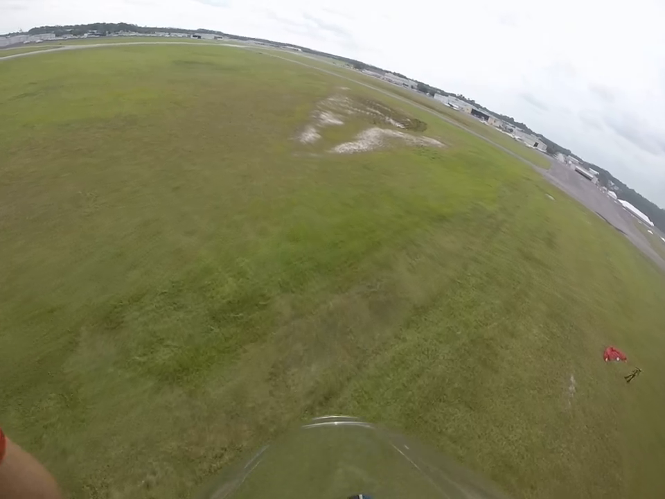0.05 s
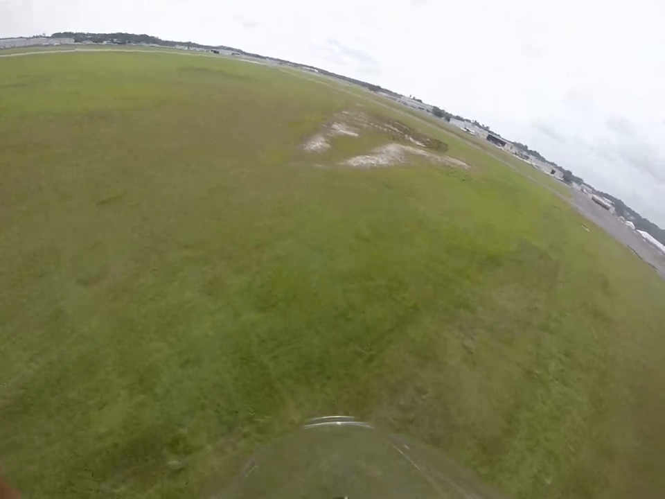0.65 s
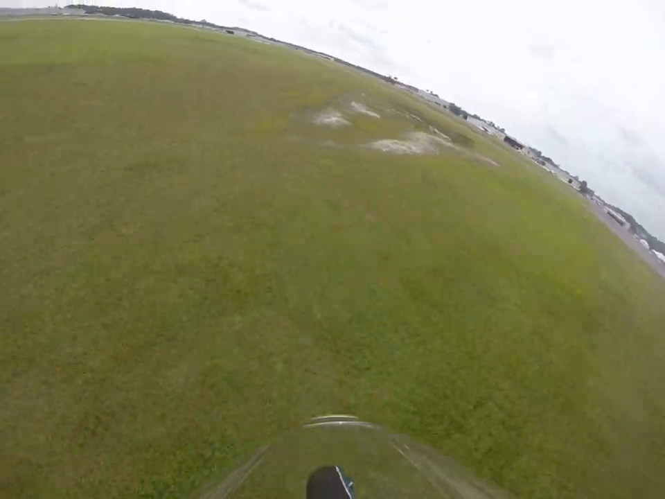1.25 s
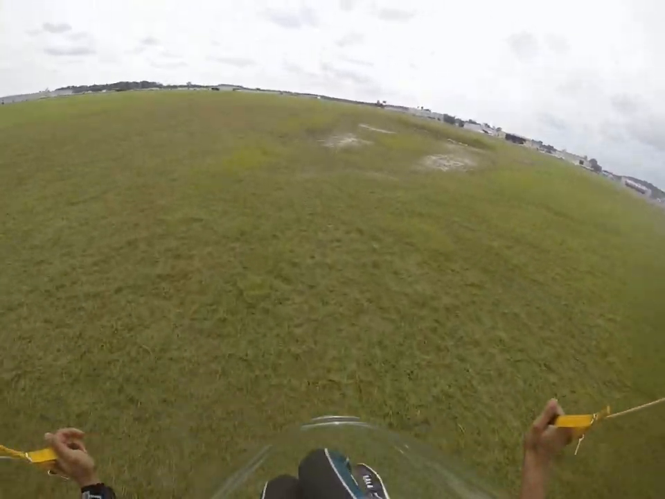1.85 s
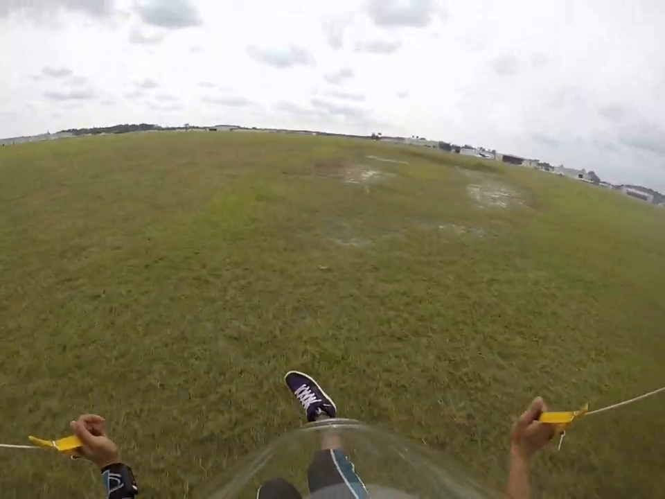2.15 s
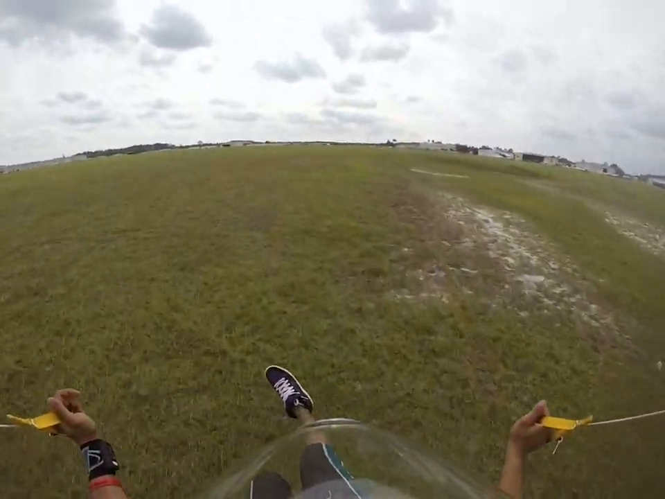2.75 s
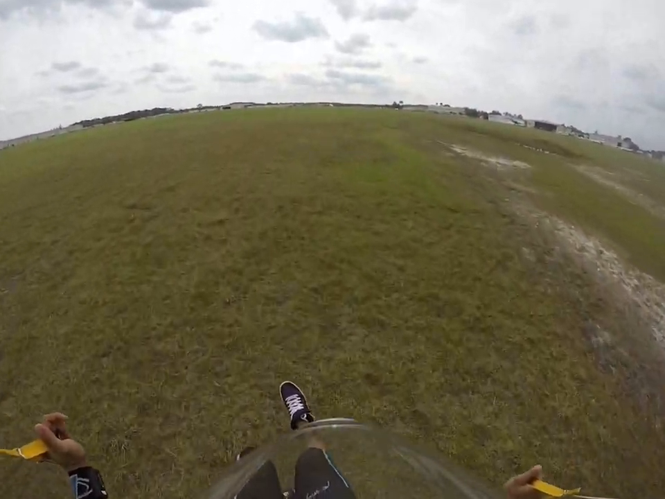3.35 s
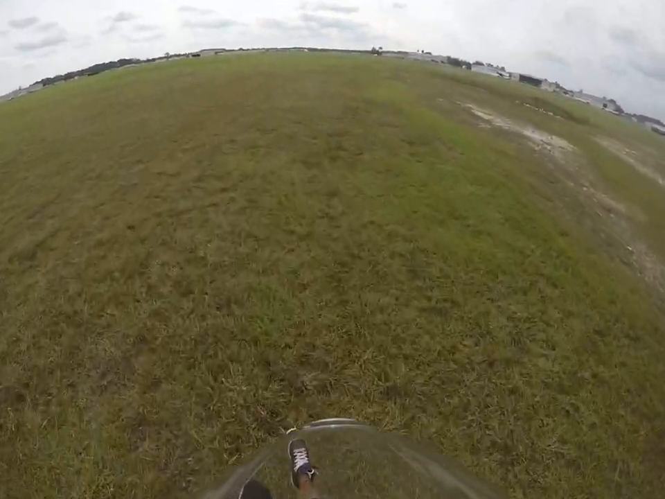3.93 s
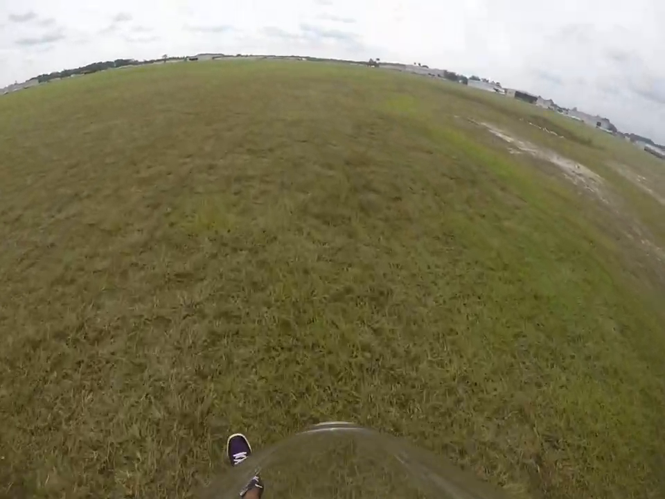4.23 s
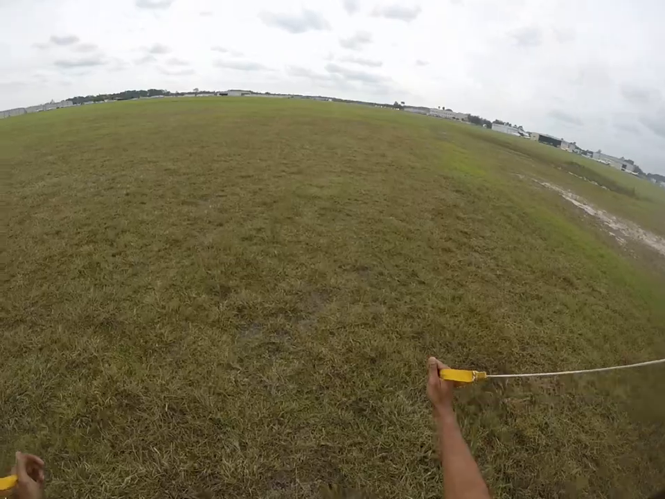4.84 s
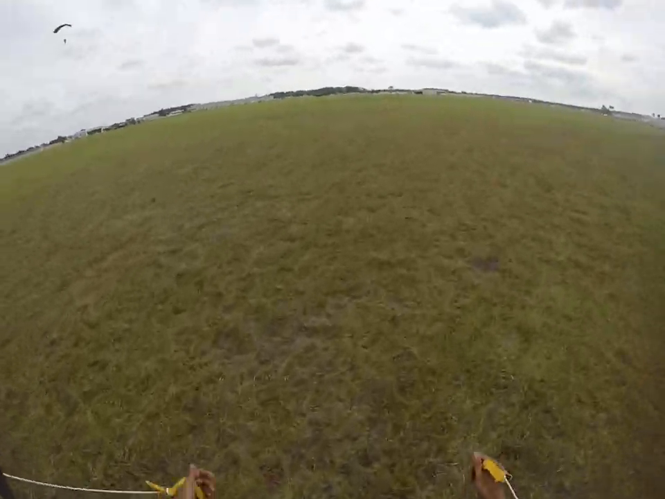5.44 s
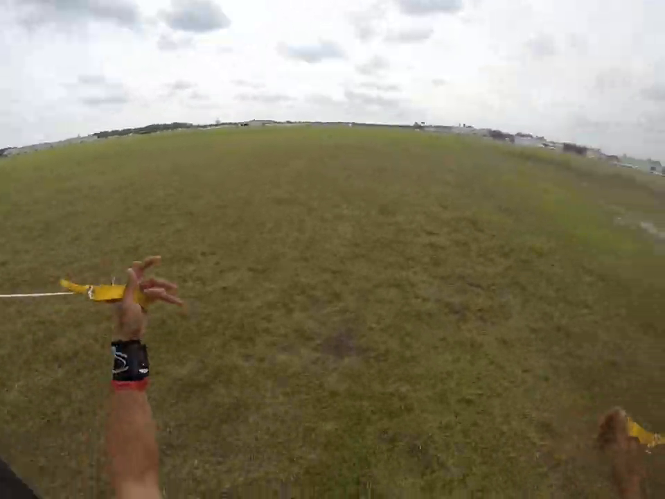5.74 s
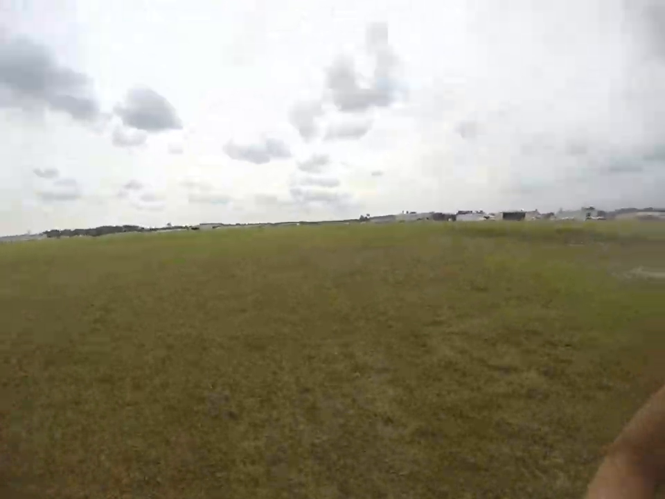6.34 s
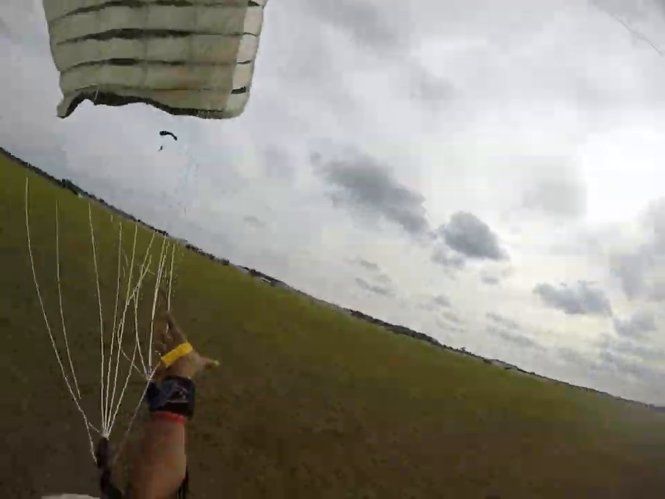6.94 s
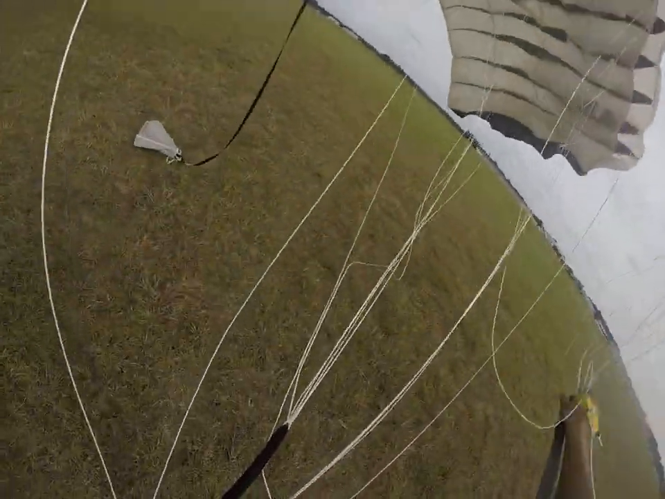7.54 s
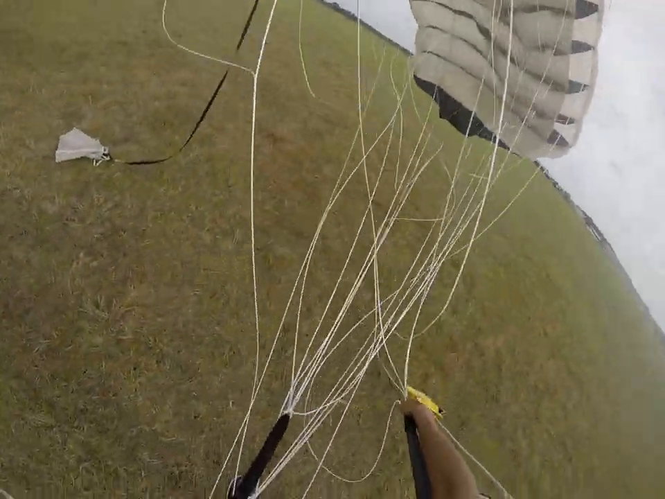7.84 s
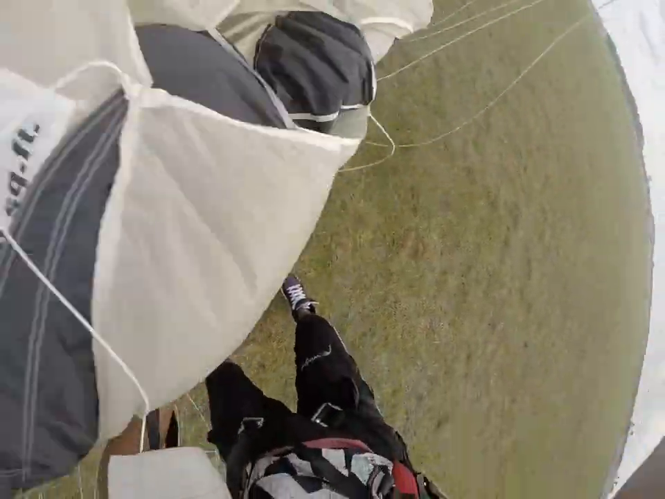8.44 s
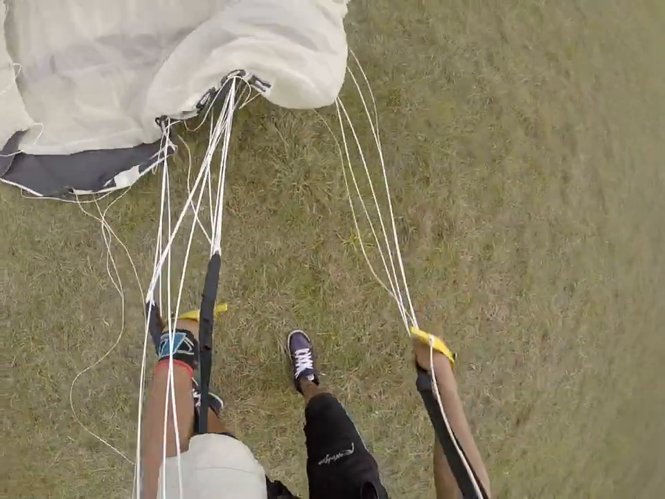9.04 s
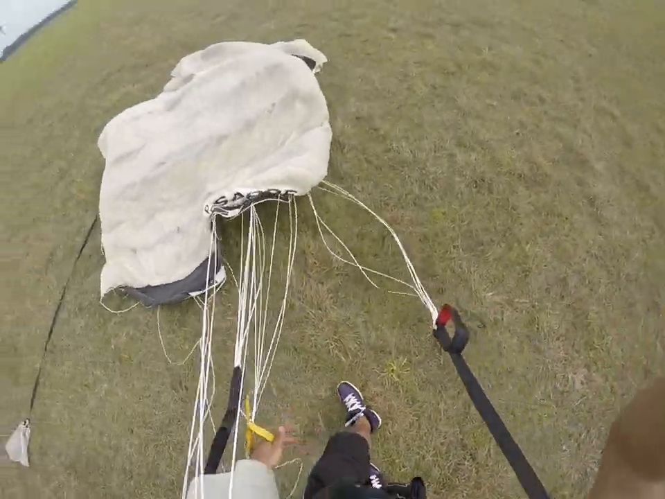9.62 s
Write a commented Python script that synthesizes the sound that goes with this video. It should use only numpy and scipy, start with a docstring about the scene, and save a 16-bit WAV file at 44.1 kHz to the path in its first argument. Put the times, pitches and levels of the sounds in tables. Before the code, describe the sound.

Wind rushes over a helmet microphone and fades, then a landing parachutist's booming footfalls, ticking gear and close scraping cloth follow.

```python
"""Wind rushes over the microphone of a cased helmet camera (mono) as a parachutist swoops over a grass field.
The air rings in the case's resonances and dies with the speed in the flare. The landing is run out
right under the microphone: footfalls boom through body and helmet, soles scuff the turf, gear ticks
and knocks. At the end lines and canopy cloth scrape over the helmet, very close, in a light breeze."""
import sys
import numpy as np
from scipy import signal
from scipy.fft import rfft, irfft, next_fast_len
from scipy.io import wavfile
from scipy.ndimage import uniform_filter1d

SR = 44100
rng = np.random.default_rng(int(sys.argv[2]) if len(sys.argv) > 2 else 0)


def generate_wav(signal):
    """Clip the signal to [-1, 1] and save it as 16-bit WAV at the path in sys.argv[1]."""
    frames = np.transpose(np.atleast_2d(signal))
    scaled = np.clip(frames, -1, 1) * 32767
    pcm = np.round(scaled).astype(np.int16)
    wavfile.write(sys.argv[1], SR, pcm)


N = 426888
TIME = np.arange(N) / SR
SHORT = TIME[:SR]  # one second

# airflow at the case: gusts in the last turn, level swoop, then the flare (time [s], strength [dB])
AIRFLOW_CURVE = [(0.0, -20), (0.46, -20), (0.62, -26), (0.71, -22.5), (0.79, -24), (0.85, -17.5),
                 (0.91, -19), (0.98, -17), (1.24, -18), (1.83, -18.5), (1.91, -21), (2.19, -23),
                 (2.29, -25), (2.4, -24), (3.18, -40.5), (4.24, -58), (4.28, -58.5)]
# roar, hollow, rush and hiss of the air: (level in the swoop [dB], slope [dB per dB of airflow],
# lift in slanting air [dB])
AIR_BANDS = [(-34, 0.545, 2), (-23.5, 0.75, -2), (-18.5, 1.0, -1.4), (-28.5, 1.18, 4)]
# edges of those four bands: (frequency [Hz])
AIR_BAND_EDGES = [110, 1100, 2200, 4700, 20000]
# air resonances of the case around the microphone: (frequency [Hz], half width [Hz], lift [dB])
CASE_RESONANCES = [(630, 43, 3.5), (1378, 65, 3.5), (1594, 232, 13), (2420, 92.0, 5), (2923, 74.0, 8),
                   (3444, 280, 15.5), (4046, 65, 7), (4850, 60, 5.5), (5600, 130, 5), (6150, 230.0, 8.5),
                   (7460.0, 170.0, 3.0)]
# edge whistles in the slipstream: (time [s], length [s], start pitch [Hz], end pitch [Hz], level [dB])
EDGE_WHISTLES = [(.51, .13, 6400, 6500, -39), (.605, .13, 5050, 5090, -33), (.72, .10, 6350, 6640, -39.5)]
# footfalls of the run-out: (time [s], boom level [dB], push length [s], skid length [s])
FOOTFALLS = [(4.323, -11.5, 0.012, 0.02), (4.358, -4.5, 0.0032, 0.027), (4.473, -4, 0.0042, .035),
             (4.528, -14, 0.018, 0.022), (4.778, -5, 0.012, 0.053), (5.334, -10.5, 0.0058, 0.037),
             (5.719, -.5, 0.0081, 0.042), (6.05, -6, 0.006, 0.009), (6.391, -3, 0.0092, 0.0078),
             (6.763, -0.5, 0.014, 0.036), (7.096, -10, 0.015, 0.012), (7.503, -14, 0.022, 0.011)]
# gear and canopy jolting the helmet: (time [s], boom level [dB], push length [s],
# ring length [factor], thud level [dB])
HELMET_JOLTS = [(4.689, -18.5, .015, 1, -38.5), (4.838, -14, .0025, .3, -22),
                (5.62, -36, 0.0033, 0.79, -36), (8.331, -5.5, 0.005, 0.55, -20.5),
                (8.405, -5.5, 0.0076, 0.75, -24), (8.538, -15, 0.0026, 0.9, -21),
                (8.758, -29, 0.0031, 1.2, -34), (9.054, -39, 0.0097, 0.95, -42.5),
                (9.327, -33, .01, 1.23, -46)]
# modes of the helmet on the head: (frequency [Hz], relative level [dB], base t60 [s])
HELMET_MODES = [(33, -6, 0.26), (50.9, 4.5, 0.45), (57.07, -10.5, 0.93), (77, -19, 0.07), (109, -9.5, 0.42),
                (168, -10.5, 0.2), (234, -5.5, 0.14)]
# hard knocks on the helmet: (time [s], level [dB], tilt [dB/octave], contact [s], relative tail [dB],
# shell ring pitch [Hz], ring level [dB], ring t60 [s], after-ring level [dB])
SHELL_KNOCKS = [(4.8358, -7, 0.3, 0.0032, -28, 1430, -11, 0.024, -65.5),
                (8.537, -10.5, -0.5, 0.0047, -8, 1870, -6.5, 0.029, -53)]
# strikes on the metal harness rings: (time [s], level [dB], ring length [factor])
HARNESS_STRIKES = [(4.335, -20.5, 0.24), (5.333, -43.5, 0.83)]
# modes of a harness ring: (frequency [Hz], relative level [dB], base t60 [s])
HARNESS_MODES = [(3208, 0, .33), (4560, -6, .17), (5820, -14, .12)]
# cloth and lines dragged over the helmet: (time [s], length [s], level [dB], sheen above 7 kHz [dB],
# catches [1/s])
CLOTH_STROKES = [(5.608, 0.007, -22.5, -20, 1200), (5.622, 0.013, -19.5, -17.5, 4800),
                 (5.638, 0.0053, -25.5, -24, 890), (5.645, 0.021, -24, -14, 1300),
                 (8.326, 0.0257, -14.5, -3, 4500), (8.352, 0.06, -18.5, 0.5, 8400),
                 (8.402, .014, -18, -17, 5000)]
# clear ticks of lines, toggles and buckles: (time [s], level [dB])
GEAR_TICKS = [(4.334, -20.5), (4.359, -19.5), (4.446, -41), (4.468, -37.5), (4.503, -39), (4.558, -38.5),
              (4.775, -34), (4.817, -33.5), (5.197, -52), (5.331, -36.5), (5.391, -41.5), (5.471, -48.5),
              (5.721, -31), (5.837, -45), (6.229, -51), (6.373, -40), (6.746, -41), (6.79, -50.5),
              (6.965, -48), (7.08, -42.5), (7.262, -39.5), (7.531, -37), (8.669, -44.5), (8.751, -48),
              (8.797, -49), (8.939, -34.5), (9.149, -38), (9.309, -42)]
# air and cloth swelling past the helmet: (centre time [s], half width [s], level [dB])
SWELLS = [(4.51, 0.025, -58), (6.499, 0.22, -59.5), (8.48, 0.042, -49.5), (8.79, .025, -57),
          (8.91, 0.03, -53), (9.03, 0.045, -49)]
# breeze on the field: (time [s], base level [dB])
BREEZE_CURVE = [(4.72, -55.5), (4.92, -67.5), (5.2, -67.5), (5.45, -62), (6.1, -60), (6.55, -59.5),
                (7.4, -56.5), (8.1, -59), (9.1, -54), (9.6, -59)]

# rushing air: (frequency [Hz], relative density [dB])
RUSH_SPECTRUM = [(100.0, -6), (280.0, -2.5), (420.0, -11.5), (1050.0, -7.5), (1400.0, -7), (2100.0, -3),
                 (4400.0, -5.5), (6300.0, -22), (7000.0, -28), (10500.0, -34.5), (15000.0, -47)]
# helmet shaken by eddies: (frequency [Hz], relative density [dB])
BUFFET_SPECTRUM = [(11, -32.5), (18, -11.5), (54, 3.5), (67, 3), (92, -7.5), (124, -2), (160, -29.5),
                   (210, -43), (350, -120)]
# helmet swaying with the jumper: (frequency [Hz], relative density [dB])
SWAY_SPECTRUM = [(11, -25.5), (18, -5.5), (27, -0.5), (43, -5), (63, -10), (86, -39.5), (114, -40),
                 (200, -43), (260, -77), (440, -120)]
# dull thud of a step or jolt: (frequency [Hz], relative density [dB])
THUD_SPECTRUM = [(20, 1), (35, -6), (70, 3), (130, -5.5), (190, -13.5), (300, -21), (500, -36.5),
                 (1000, -51.5), (3000, -77)]
# blow on the shell: (frequency [Hz], relative density [dB])
KNOCK_SPECTRUM = [(120, 8.5), (300, 2), (600, 1), (900, -5), (1500, -2.5), (2700, -5), (3600, -14.5),
                  (6200, -16), (7500, -42.5), (15000, -58)]
# cloth on the shell: (frequency [Hz], relative density [dB])
SCRAPE_SPECTRUM = [(200, -6), (700, -6), (1600, -7.5), (2500, 1), (3500, -6), (4700, 1), (6400, -8.5),
                   (8200, -4), (11000, -14), (15000, -17)]
# ticking gear and swishing cloth: (frequency [Hz], relative density [dB])
GEAR_SPECTRUM = [(200, 1), (700, -6.5), (1400, -4), (2700, 0), (3500, -6.5), (6300, -10.5), (7200, -17),
                 (14000, -32)]
# soles in the turf: (frequency [Hz], relative density [dB])
SCUFF_SPECTRUM = [(100, -2), (190, 5.5), (240, 1.5), (330, 1), (450, -8.5), (750, -8.5), (950, -11),
                  (1150, -17.5), (2000, -20.5), (3500, -28.5), (6000, -34), (7500, -50), (15000, -62.5)]
# light air in the case: (frequency [Hz], relative density [dB])
BREEZE_SPECTRUM = [(60, -13.5), (120, 14.5), (190, 4), (300, 6), (420, -3.5), (520, -1), (590, 4.5),
                   (700, -3.5), (1000, -4), (1700, -8.5), (2200, -6), (3600, -7.5), (6500, -19.5),
                   (15000, -34)]

SWOOP_DB = -17.5  # airflow strength in the level swoop
TURN_END_S, ROLL_OUT_S = .81, .06  # in the turn the air meets the case at a slant
BUFFET_DB, BUFFET_SLOPE = -31.5, 0.39  # shaking of the helmet in the swoop; dB per dB of airflow
TOUCHDOWN_S, RUN_START_S, RUN_END_S = 4.32, 5.1, 7.6
# thud and scuff relative to the boom at touchdown; both soften as the run slows
THUD_DB, THUD_FALL_DB_PER_S = -10.5, 8
SCUFF_DB, SCUFF_FALL_DB_PER_S, SCUFF_LEAD_S = -17.5, 9, .003
RING_AT_FULL, RING_PER_DB = 0.75, 0.0057  # ring length factor: the padding damps hard pushes sooner
HEAVY_TICK_DB, TICK_DULLING = -33, 0.39  # heavier parts tick louder and duller: dB/octave per dB over
AFTER_RING_HZ, AFTER_RING_T60_S = 1850, .8  # a faint ring of the shell sings on after each knock
JIGGLE_PER_S, JIGGLE_DB, JIGGLE_SPREAD_DB, JIGGLE_T60_S = 6.8, -52, 3, 0.015


def slipstream():
    """Turbulence blows through the case; slower air makes larger eddies, so the treble fades first."""
    flow_db = airflow_db()
    slant = np.clip((TURN_END_S - TIME) / ROLL_OUT_S + .5, 0, 1)
    air = colour(rng.standard_normal(N), RUSH_SPECTRUM, case=1.0)
    rush = np.zeros(N)
    for lo, hi, (db, slope, slant_db) in zip(AIR_BAND_EDGES, AIR_BAND_EDGES[1:], AIR_BANDS):
        rush += unit(band(air, lo, hi)) * undb(db + slope * flow_db + slant_db * slant)
    eddies_db = 0.23 * walk(25) + .6 * walk(160)
    return rush * undb(eddies_db) * np.interp(TIME, [4.3, 4.77, 4.87], [1, .6, 0])


def buffeting():
    """Slow eddies shake the helmet; on the ground it sways more gently with the jumper."""
    airborne_db = BUFFET_DB + BUFFET_SLOPE * airflow_db()
    sway_db = np.interp(TIME, [5.1, 6.6, 7.9, 9.68], [-38.5, -30, -38, -46.5])
    eddies = unit(colour(rng.standard_normal(N), BUFFET_SPECTRUM)) * undb(airborne_db + 1.3 * walk(22))
    sway = unit(colour(rng.standard_normal(N), SWAY_SPECTRUM)) * undb(sway_db + 1.5 * walk(9))
    landed = np.clip((TIME - TOUCHDOWN_S) / .5, 0, 1)
    return (1 - landed) * eddies + landed * sway


def footfalls_and_jolts():
    """Each push booms in the helmet's low modes, right under the microphone; the body jostles on."""
    out = np.zeros(N)
    steps = []
    for s, db, push_s, _ in FOOTFALLS:
        thud_db = db + THUD_DB - THUD_FALL_DB_PER_S * (s - TOUCHDOWN_S)
        steps.append((s, db, push_s, RING_AT_FULL - RING_PER_DB * db, thud_db))
    for s, db, push_s, ring, thud_db in steps + HELMET_JOLTS:
        push = bell(SHORT - .02, push_s / 2, 0.28 * push_s)
        jostle = unit(band(rng.standard_normal(SR), 25, 130)) * fade(0.39)
        jostle *= np.clip((SHORT - .03) / .02, 0, 1)
        modes = sum(mode(hz * (1 + 0.027 * rng.standard_normal()), mode_db, t60 * ring)
                    for hz, mode_db, t60 in HELMET_MODES)
        modes *= 1 - np.exp(-SHORT / (0.0066 * ring))  # through the padding the motion builds gradually
        boom = signal.fftconvolve(push + 6 * push_s * jostle, modes)[:SR]
        add(out, s - .02, burst(boom, db, length=0.022 * ring))
        thud = rng.standard_normal(SR) * fade(0.19) * (1 - np.exp(-SHORT / 0.0071)) ** 2
        add(out, s - .014, burst(colour(thud, THUD_SPECTRUM), thud_db, length=0.07))
    return out


def knocks():
    """Sharp blows next to the microphone ring the shell and leave a short rattle."""
    out = np.zeros(N)
    for s, db, tilt_db, contact_s, tail_db, ring_hz, ring_db, ring_t60, after_db in SHELL_KNOCKS:
        contact = stroke(contact_s, rise_s=0.00041, release_s=0.0018)
        blow = rng.standard_normal(SR) * (contact + undb(tail_db) * fade(0.094))
        add(out, s, burst(colour(blow, KNOCK_SPECTRUM, case=0.28, tilt_db=tilt_db), db))
        add(out, s + 0.001095, mode(ring_hz, ring_db, ring_t60))
        add(out, s, mode(AFTER_RING_HZ, after_db, AFTER_RING_T60_S))
    return out


def scrapes():
    """Cloth on the helmet, very close: the weave catches and slips; each stroke has its own sheen and grain."""
    out = np.zeros(N)
    for s, length, db, sheen_db, catches_per_s in CLOTH_STROKES:
        drag = stroke(length, rise_s=.0015, release_s=.002) + undb(-24) * fade(0.33)
        slips = crackle(catches_per_s, SR) + 0.11 * rng.standard_normal(SR)
        spectrum = [(hz, level + sheen_db * (hz > 7000)) for hz, level in SCRAPE_SPECTRUM]
        add(out, s, burst(colour(slips * drag, spectrum, case=0.44), db, length=length))
    return out


def scuffs():
    """Soles tear the turf a body's length below the microphone: snapping blades over a dull grind."""
    out = np.zeros(N)
    for s, boom_db, _, skid_s in FOOTFALLS:
        db = boom_db + SCUFF_DB - SCUFF_FALL_DB_PER_S * (s - TOUCHDOWN_S)
        skid = stroke(skid_s, rise_s=0.0041, release_s=0.0049)
        blades = crackle(900, SR) + 0.03 * rng.standard_normal(SR)
        scuff = colour(blades * skid, SCUFF_SPECTRUM, case=0.21)
        add(out, s - SCUFF_LEAD_S, burst(scuff, db, length=skid_s))
    return out


def ticks():
    """Small hard parts within arm's reach touch, rebound milliseconds later and rattle briefly."""
    out, n = np.zeros(N), SR // 10
    for s, db in GEAR_TICKS:
        tilt_db = -TICK_DULLING * max(db - HEAVY_TICK_DB, 0)
        contact = rng.standard_normal(n) * (fade(.010) * np.minimum(SHORT / 0.002, 1))[:n]
        rebound_s = rng.uniform(0.0023, 0.006)
        rebound = .5 * rng.standard_normal(n) * fade(0.008)[:n]
        add(contact, rebound_s, rebound[:n // 2])
        rattle = band(rng.standard_normal(n), 230, 9200) * undb(-14) * fade(0.071)[:n]
        tick = colour(contact + rattle, GEAR_SPECTRUM, case=0.11, tilt_db=tilt_db)
        add(out, s - .001, burst(tick, db))
    return out


def clinks():
    """Metal harness rings below the helmet are struck and sound their high modes."""
    out = np.zeros(N)
    for s, db, ring in HARNESS_STRIKES:
        add(out, s, sum(mode(hz, db + mode_db, t60 * ring) for hz, mode_db, t60 in HARNESS_MODES))
    return out


def whistles():
    """An edge in the slipstream sheds vortices and sings briefly, with unsteady pitch."""
    out = np.zeros(N)
    for s, length, start_hz, end_hz, db in EDGE_WHISTLES:
        n = int(length * SR)
        hz = np.linspace(start_hz, end_hz, n) * (1 + 0.009 * walk(600)[:n])
        tone = np.sqrt(2) * np.sin(2 * np.pi * np.cumsum(hz) / SR)
        add(out, s, undb(db) * tone * signal.windows.tukey(n, .5))
    return out


def jiggle():
    """While the jumper runs, loose gear ticks faintly at uneven intervals."""
    out = np.zeros(N)
    contact = fade(JIGGLE_T60_S)[:SR // 20]
    for k, (lag, size) in enumerate(rng.random((80, 2))):
        s = RUN_START_S + (k + lag) / JIGGLE_PER_S
        if s < RUN_END_S:
            tick = colour(rng.standard_normal(len(contact)) * contact, GEAR_SPECTRUM, case=.24)
            add(out, s, burst(tick, JIGGLE_DB + JIGGLE_SPREAD_DB * (2 * size - 1)))
    return out


def swishes():
    """Air and folds of the canopy slide close past the microphone in soft swells."""
    swell = sum(undb(db) * bell(TIME, s, width) for s, width, db in SWELLS)
    rustle = unit(colour(rng.standard_normal(N), GEAR_SPECTRUM, case=0.38))
    return swell * rustle * undb(1.4 * walk(90))


def breeze():
    """On the field: light air in the case and crinkles of sinking cloth, over the microphone's hiss."""
    crinkles = crackle(45, N)
    air = colour(rng.standard_normal(N) + 10 * crinkles, BREEZE_SPECTRUM, case=0.44)
    air /= np.std(band(air, 1200, 4500))  # the level applies to this band
    hiss_db = np.interp(TIME, [3, 4.3, 4.9, 6.5], [-75.5, -73.5, -93.5, -79.5])
    hiss = unit(band(rng.standard_normal(N), 5000, 15000)) * undb(hiss_db)
    air_db = curve(BREEZE_CURVE) - 1 + 0.59 * walk(22)
    return air * undb(air_db) * np.interp(TIME, [4.5, 4.87], [0, 1]) + hiss


def airflow_db():
    """Strength of the airflow relative to the level swoop."""
    return curve(AIRFLOW_CURVE) - SWOOP_DB


def undb(db):
    """Decibels to gain."""
    return 10 ** (np.asarray(db) / 20)


def unit(x):
    """Scale to rms 1."""
    return x / np.sqrt(np.mean(x ** 2))


def curve(table):
    """A timed table as one value per sample."""
    return np.interp(TIME, *np.transpose(table))


def bell(x, centre, width):
    """Gaussian bump of height 1."""
    return np.exp(-.5 * ((x - centre) / width) ** 2)


def fade(t60):
    """Exponential decay over one second."""
    return np.exp(-np.log(1000) * SHORT / t60)


def mode(hz, db, t60):
    """One struck mode: a decaying sine."""
    return undb(db) * fade(t60) * np.sin(2 * np.pi * hz * SHORT)


def stroke(length, rise_s, release_s):
    """Envelope of a contact: rises, holds until length seconds, dies away."""
    return np.minimum(SHORT / rise_s, 1) * np.exp(-np.maximum(SHORT - length, 0) / release_s)


def crackle(per_s, n):
    """Impulses of random time and size over n samples."""
    return (rng.random(n) < per_s / SR) * rng.standard_normal(n)


def walk(rate):
    """Smooth random wander with a spread near 1."""
    k = int(SR / rate)
    held = np.repeat(rng.standard_normal(N // k + 1), k)
    return unit(uniform_filter1d(uniform_filter1d(held, k), k)[:N])


def band(x, lo_hz, hi_hz):
    """Steep band-pass without delay."""
    sos = signal.butter(4, [lo_hz, min(hi_hz, SR / 2 - 1)], "band", fs=SR, output="sos")
    return signal.sosfiltfilt(sos, x)


def colour(x, spectrum, case=0., tilt_db=0.):
    """Causal filter: a spectrum, a tilt per octave and a share of the case resonances."""
    size = next_fast_len(len(x) // 2 + 1) * 2
    f = np.maximum(np.arange(size // 2 + 1) * SR / size, 1)
    hz, db = np.transpose(spectrum)
    db = np.interp(np.log(f), np.log(hz), db) + tilt_db * np.log2(np.maximum(f, 500) / 2000)
    db += case * sum(lift * bell(f, centre, width) for centre, width, lift in CASE_RESONANCES)
    cepstrum = irfft(np.log(undb(db)))
    cepstrum[1:size // 2] *= 2  # minimum phase: nothing rings ahead of a hit
    cepstrum[size // 2 + 1:] = 0
    return irfft(rfft(x, size) * np.exp(rfft(cepstrum)))[:len(x)]


def burst(x, db, length=.015):
    """Scale a short sound so that its energy, spread over length seconds, has this level."""
    return x * undb(db) * np.sqrt(length * SR / np.sum(x ** 2))


def add(out, s, x):
    """Mix a sound in at time s."""
    i = int(s * SR)
    out[i:i + len(x)] += x[:N - i]


def scene():
    """All sources reach the one microphone in the case; both channels are the same."""
    air = slipstream() + buffeting() + whistles() + breeze()
    landing = footfalls_and_jolts() + scuffs()
    gear = ticks() + jiggle() + knocks() + clinks()
    canopy = scrapes() + swishes()
    mono = air + landing + gear + canopy
    return np.array([mono, mono])


def record(dry):
    """The camera drops the deepest bass, clips at full scale and cuts the top."""
    low_cut = signal.butter(2, 14, "high", fs=SR, output="sos")
    top_cut = signal.ellip(10, .1, 80, 15300, fs=SR, output="sos")
    clipped = np.clip(signal.sosfilt(low_cut, dry), -1, 1)
    return signal.sosfilt(top_cut, clipped)


dry = scene()
out = record(dry)
generate_wav(out)
```